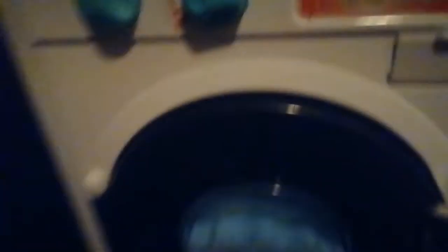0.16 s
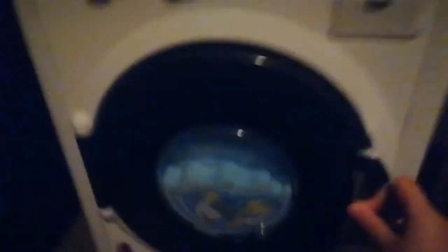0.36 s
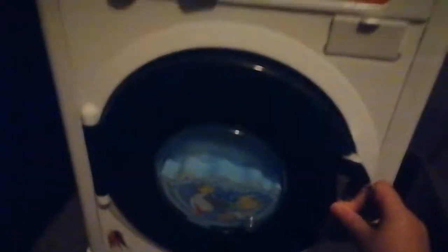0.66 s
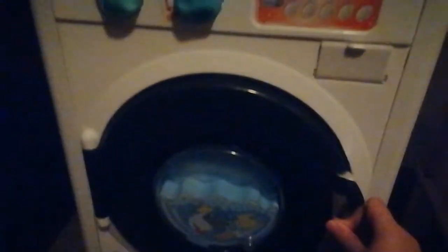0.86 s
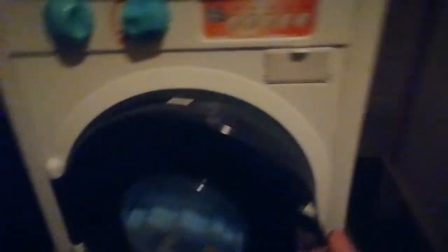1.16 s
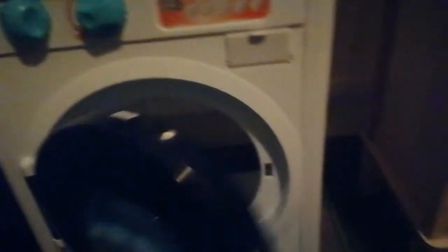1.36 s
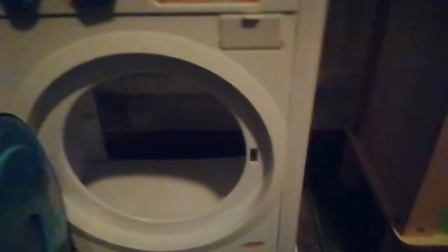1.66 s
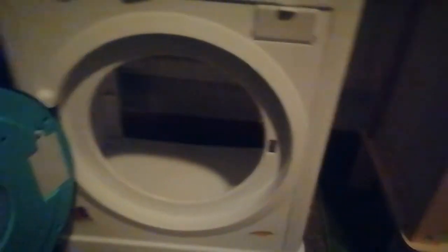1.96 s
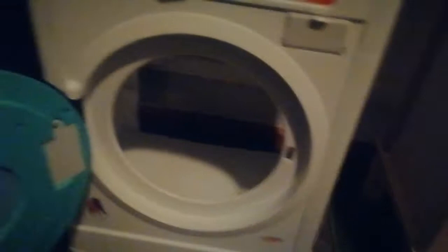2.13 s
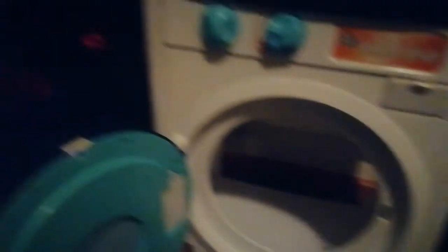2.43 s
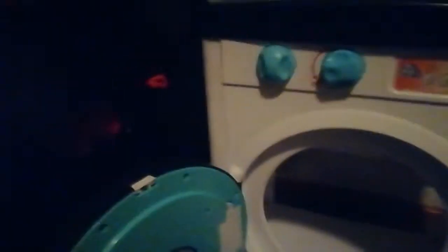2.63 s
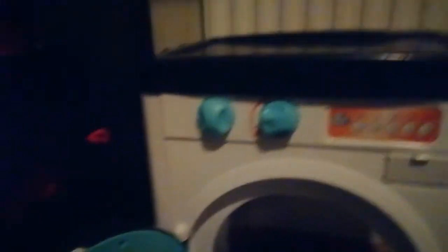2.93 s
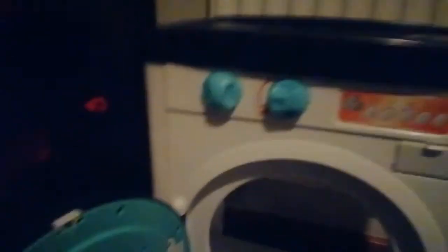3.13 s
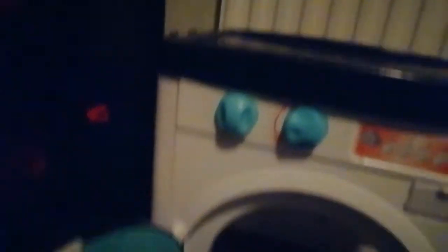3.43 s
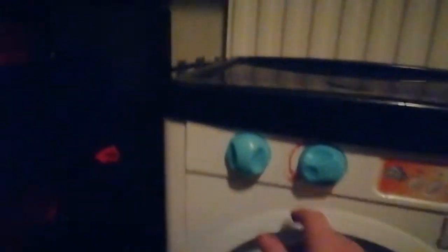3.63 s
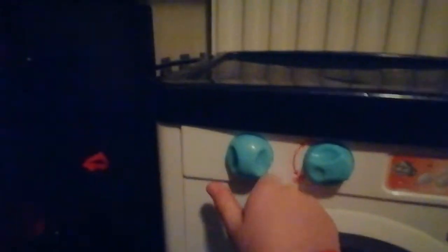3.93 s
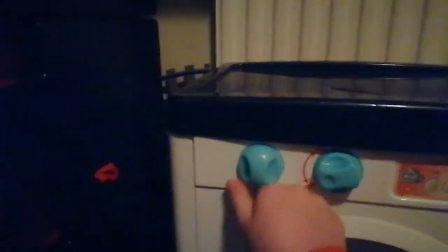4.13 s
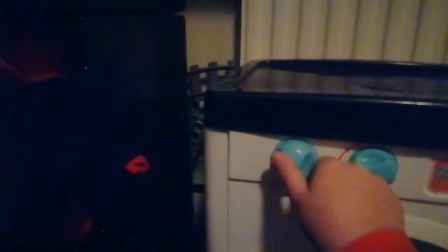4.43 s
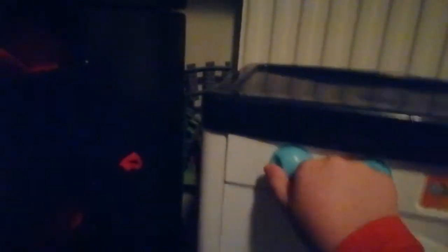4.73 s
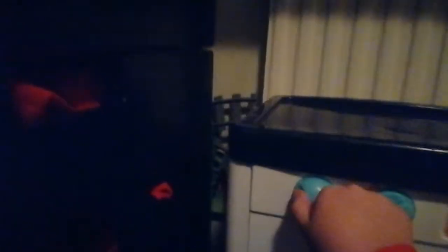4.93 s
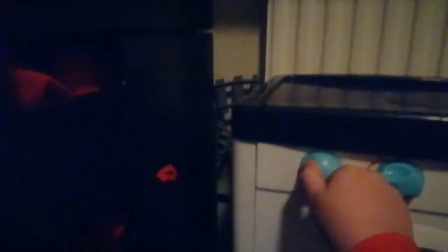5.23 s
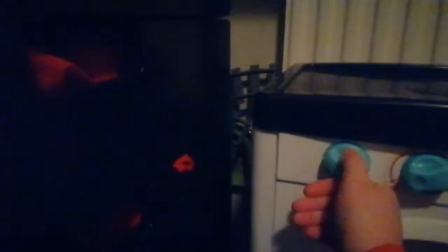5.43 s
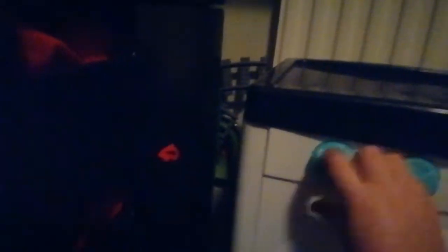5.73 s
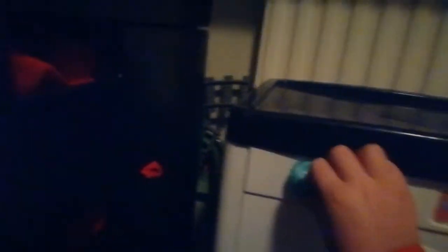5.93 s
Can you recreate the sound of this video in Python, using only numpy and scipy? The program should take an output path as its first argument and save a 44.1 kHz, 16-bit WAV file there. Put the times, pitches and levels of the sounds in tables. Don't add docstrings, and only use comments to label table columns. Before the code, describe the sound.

Hollow plastic toy washer door is tapped, unlatched with creaky clicks and banged open, then a knob ratchets with loud sharp snaps in a small room.

```python
import sys
import numpy as np
from scipy import signal
from scipy.fft import rfft, irfft
from scipy.io import wavfile
from scipy.ndimage import uniform_filter1d

SR = 44100
rng = np.random.default_rng(int(sys.argv[2]) if len(sys.argv) > 2 else 0)


def level_to_linear(level):
    exponent = np.asarray(level, float) / 20
    return 10 ** exponent


def waveform_to_disk(signal):
    frames = np.transpose(np.atleast_2d(signal))
    scaled = np.clip(frames, -1, 1) * 32767
    samples = np.round(scaled).astype(np.int16)
    wavfile.write(sys.argv[1], SR, samples)


N = 268128


def level(x, db):
    return x * level_to_linear(db) / np.sqrt(np.mean(x ** 2))


def colour(x, spectrum):
    hz, db = np.transpose(spectrum)
    f = np.arange(len(x) // 2 + 1) * SR / len(x)
    gain = level_to_linear(np.interp(np.log(f + 1), np.log(hz), db))
    return irfft(rfft(x) * gain, len(x))


def band(x, hz, width_hz):
    return signal.lfilter(*signal.iirpeak(hz, hz / width_hz, fs=SR), x)


def wander(size):
    smooth = uniform_filter1d(rng.standard_normal(N), size)
    return level(uniform_filter1d(smooth, size), 0)


def even(burst):
    spectrum = rfft(burst, 2 * len(burst))
    return irfft(spectrum / np.abs(spectrum))[:len(burst)]


def add(out, s, sound):
    i = int(round(s * SR))
    out[i:i + len(sound)] += sound[:N - i]


# start_s, level_db
RUMBLE_LEVEL = [(0, -68), (0.83, -71), (1.07, -68.5), (1.7, -70.5), (2.2, -67), (3.71, -68), (4.2, -74),
                (5.3, -72.5), (5.42, -68), (6.08, -71.5)]
# centre_s, level_db, half_length_s
SQUEEZES = [
    (1.09, -69, 0.08),
    (3.2, -76, 0.2),
    (4.0, -84, 0.15),
    (5.0, -77.5, 0.2),
    (5.34, -56, 0.08),
    (5.69, -69.5, 0.06),
    (5.98, -78, 0.06),
]
# centre_s, level_db, pitch_hz
THUMPS = [
    (0.429, -57, 21.7),
    (0.471, -58, 20.9),
    (2.563, -44, 116.6),
    (2.674, -59.5, 65),
    (2.706, -47, 40),
    (3.069, -50.5, 22.1),
    (3.091, -48.5, 24.4),
    (3.25, -54.5, 45),
    (4.806, -56, 231),
]


def handling():
    t = np.arange(N) / SR
    motor_hz = 44.5 + 5 * wander(size=2000)
    drone = np.sqrt(2) * np.sin(2 * np.pi * np.cumsum(motor_hz) / SR)
    drone += level(band(band(rng.standard_normal(N), 54.0, 30.0), 54.0, 30.0), -5.5)

    creep = level(band(band(rng.standard_normal(N), 170.0, 250.0), 170.0, 250.0), -1.7)
    creep *= level_to_linear(3.7 * wander(size=600))
    grip = level_to_linear(-80.5)
    for s, db, half_s in SQUEEZES:
        grip = grip + level_to_linear(db) * np.exp(-((t - s) / half_s) ** 2)

    out = drone * level_to_linear(np.interp(t, *np.transpose(RUMBLE_LEVEL))) + creep * grip
    for s, db, hz in THUMPS:
        turn = hz * (t - s)
        out = out + level_to_linear(db) * np.cos(2 * np.pi * turn + 0.18) * np.exp(-3.0 * turn ** 2)
    return out


# frequency_hz, density_db_per_hz
AIR_SPECTRUM = [(60, -30), (150, -8.5), (350, -2), (800, -2.5), (1400, -4.5), (3000, -7.5), (5000, -8.5),
                (9000, -18), (12000, -39)]


def room_air():
    return level(colour(rng.standard_normal(N), AIR_SPECTRUM), -73.5)


# harmonic_multiple, level_db
WHINE_HARMONICS = [(1, -89), (2, -92.5), (4, -81.5)]


def circuit_whine():
    turns = np.cumsum(810 + 5 * wander(size=200)) / SR
    return sum(level_to_linear(db) * np.sqrt(2) * np.sin(2 * np.pi * k * turns) for k, db in WHINE_HARMONICS)


# frequency_hz, density_db_per_hz
HISS_SPECTRUM = [(60, -3.5), (600, -6), (4000, -4.5), (8000, -7.5), (16000, -13.5)]


def port_hiss(db):
    return level(colour(rng.standard_normal(N), HISS_SPECTRUM), db)


def ring(modes, chance=np.zeros((2, 16)), spread_db=0.0):
    hz, db, t60 = np.transpose(modes)[:, :, None]
    t = np.arange(6000) / SR
    gain_chance, pitch_chance = chance[:, :len(modes), None]
    gains = level_to_linear(db + spread_db * gain_chance)
    sines = np.sin(2 * np.pi * hz * (1 + 0.0033 * pitch_chance) * t)
    total = -np.sum(gains * sines * 1000.0 ** (-t / t60), axis=0)
    edges_hz = [0.81 * hz.min(), 3.1 * hz.max()]
    return signal.sosfilt(signal.butter(2, edges_hz, "band", fs=SR, output="sos"), total)


def crack(spectrum, noise, t60):
    t = np.arange(len(noise)) / SR
    fade = 1000.0 ** (-t / t60)
    burst = colour(even(noise * fade), spectrum)
    return burst * np.sqrt(fade) * (1 - np.exp(-t / 0.0001))


def kind(rows, thud_db, crack_db, rattle_ms, extra="thud"):
    events = []
    for s, db, *more in rows:
        more_thud = sum(more) if extra == "thud" else 0
        more_crack = sum(more) if extra == "crack" else 0
        events.append((s, db, thud_db + more_thud, crack_db + more_crack, rattle_ms))
    return events


def blows(events, thud, body, skin, crack_t60, chatter, cap=None):
    out, t_ms = np.zeros(N), 1000 * np.arange(800) / SR
    own = rng.standard_normal(2048)
    grits = rng.standard_normal((len(events), 2848))
    chances = rng.standard_normal((len(events), 2, 2, 16))
    for event, grit, (thud_chance, ring_chance) in zip(events, grits, chances):
        s, db, thud_db, crack_db, rattle_ms = event
        age = t_ms / max(rattle_ms, 0.1)
        push = chatter * grit[:800] ** 3 * age * np.exp(1 - age)
        push[0] = 1
        contact_hz = min(7000 + 30000 * level_to_linear(db), 19000)
        push = signal.lfilter(*signal.butter(2, contact_hz, fs=SR), even(push))

        struck = cap if cap and db < -20 else body
        parts = [(ring(thud, thud_chance, 0.68), thud_db),
                 (ring(struck, ring_chance, 0.72), 0),
                 (crack(skin, own + grit[800:], crack_t60), crack_db)]
        for response, part_db in parts:
            part = signal.fftconvolve(push, response)
            add(out, s, level_to_linear(db + part_db) * part / np.abs(part).max())
    return out


# frequency_hz, level_db, t60_s
DRUM_MODES = [(162, 2, 0.031), (224.6, 13, 0.058), (312, 2.5, 0.029), (420, 1, 0.046), (537, -5.5, 0.13),
              (758, -31, 0.12)]
DOOR_MODES = [(764, -0.5, 0.057), (918, 7, 0.016), (1450, 8.5, 0.0062), (1940, -9, 0.014)]
# frequency_hz, density_db_per_hz
RIM_SPECTRUM = [(500, -14.5), (1200, -14.5), (2200, -11), (3200, -9.5), (4300, -1.5), (5500, -7.5),
                (7200, -14), (9500, -27.5), (15000, -42)]
# start_s, ring_db
TAPS = [
    (0.141, -60),
    (0.334, -56),
    (0.492, -57),
    (0.634, -53),
]
# start_s, ring_db
TICKS = [
    (0.521, -68),
    (0.9273, -52),
    (0.9787, -45),
    (1.074, -49),
    (1.1895, -63),
    (1.423, -52.5),
    (1.518, -67),
]
# start_s, ring_db, extra_thud_db
PULLS = [(0.904, -45, 0.5), (0.927, -72, 0), (0.935, -42, -10), (0.943, -48, 1), (0.959, -63, 10),
         (0.976, -49, 6.5), (1.012, -63, 2), (1.088, -57, -3), (1.102, -53, -14), (1.112, -55, 9.5),
         (1.148, -50, 11), (1.191, -43.5, -10.5)]
# start_s, ring_db, extra_thud_db
SWINGS = [
    (1.384, -59, -2),
    (1.454, -49, -18),
    (1.476, -55.5, 10),
    (1.485, -67, 16),
]


def door_and_latch():
    events = kind(TAPS, thud_db=2.6, crack_db=-7, rattle_ms=2.4)
    events += kind(TICKS, thud_db=-19, crack_db=8.4, rattle_ms=0.89)
    events += kind(PULLS, thud_db=0.1, crack_db=-8.5, rattle_ms=1.18)
    events += kind(SWINGS, thud_db=-14, crack_db=-12, rattle_ms=1.9)
    return blows(events, DRUM_MODES, DOOR_MODES, RIM_SPECTRUM, crack_t60=0.013, chatter=0.071)


# start_s, length_s, rub_db, drum_minus_rub_db
RUBS = [
    (0.904, 0.047, -67, 15),
    (0.975, 0.0066, -46, 7.5),
    (1.008, 0.067, -61.5, -3),
    (1.073, 0.033, -53, -2),
    (1.119, 0.082, -57, 15.5),
    (1.415, 0.0089, -64, -12),
    (1.464, 0.019, -69.5, 5),
    (1.484, 0.037, -73.5, 9),
    (3.755, 0.039, -71.5, 13.5),
    (4.278, 0.024, -84.5, 24.5),
]
# frequency_hz, density_db_per_hz
RUB_SPECTRUM = [(300, -16.5), (700, -4.5), (1600, 3), (3000, -0.5), (4400, -2.5), (6500, -9), (9500, -22.5),
                (15000, -33)]


def rubbing():
    t, out = np.arange(N) / SR, 0
    attack_s, release_s = 0.0021, 0.0117
    slips = rng.standard_normal(N) * level_to_linear(4.0 * rng.exponential(size=N).clip(0, 5))
    skin = level(colour(slips, RUB_SPECTRUM), 0.55)
    drum = level(signal.fftconvolve(slips, ring(DRUM_MODES))[:N], -5.5)
    for s, length_s, db, drum_db in RUBS:
        rise = np.clip((t - s) / attack_s, 0, 1)
        fall = np.exp(-np.clip(t - s - length_s, 0, 1) / release_s)
        out = out + rise * fall * level_to_linear(db) * (skin + level_to_linear(drum_db) * drum)
    return out


# centre_s, level_db, pitch_hz, swell_ms
GROANS = [
    (1.14, -25.5, 230, 2.84),
    (1.195, -35.5, 212, 1.8),
    (3.7984, -53, 2810, 1.3),
    (1.075, -43.5, 4200, 1.1),
]


def groans():
    t, out = np.arange(N) / SR, np.zeros(N)
    for s, db, hz, swell_ms in GROANS:
        swell = 1 / np.cosh(1000 * (t - s).clip(-0.2, 0.2) / swell_ms)
        out += level_to_linear(db) * np.sin(2 * np.pi * hz * (t - s)) * swell
    return out


# frequency_hz, level_db, t60_s
CABINET_MODES = [(122.8, -10.5, 0.03), (189, -18, 0.027), (290, -9, .08), (412.4, 4, 0.071),
                 (491, 1.5, .06), (591.5, 3.5, 0.055)]
SHELL_MODES = [(743, -8, 0.15), (927, 5, 0.032), (1028, 8, 0.027), (1200, 6.5, 0.04), (1300, -7, 0.045)]
# start_s, ring_db, extra_crack_db
BANGS = [
    (2.1005, -26.5, 7),
    (2.114, -30, -1),
    (2.127, -39, 3),
]
# start_s, ring_db, extra_crack_db
BOUNCES = [
    (2.105, -32, 20),
    (2.1603, -69, 6),
    (2.1605, -21, -9.5),
    (2.197, -57, -15),
]


def door_stop():
    events = kind(BANGS, thud_db=-3, crack_db=0.1, rattle_ms=3.3, extra="crack")
    events += kind(BOUNCES, thud_db=-17.5, crack_db=0.09, rattle_ms=0.22, extra="crack")
    return blows(events, CABINET_MODES, SHELL_MODES, RIM_SPECTRUM, crack_t60=0.014, chatter=0.13)


# frequency_hz, level_db, t60_s
KNOB_MODES = [(626, -4.5, .03), (922, -1.5, 0.039), (1180, -18, .025), (1265, -2.5, 0.036), (1460, 3, 0.03),
              (1496, -0.5, 0.02), (1722, 7.5, 0.023), (1874, -12.5, 0.0099), (2210, 0, 0.026)]
CAP_MODES = [(885, -14, .025), (1224, -6.5, .03), (1481, 2.5, 0.032), (1679, 2.5, 0.026), (2218, -12, 0.03),
             (3110, -8.5, .02), (4330, -12, .015), (4644, -6.5, 0.02), (5540, -12.5, 0.012)]
# frequency_hz, density_db_per_hz
PAWL_SPECTRUM = [(500, -30), (1000, -25), (2000, -0.5), (3000, -7), (4300, 3.5), (5500, -6), (6500, -5.5),
                 (8000, -14.5), (10500, -29.5), (15000, -43)]
# start_s, ring_db, extra_thud_db
TOUCHES = [(3.741, -54, 11.5), (3.77, -60, 10), (4.193, -51, 4), (4.275, -59, 7.5), (4.295, -79, -6),
           (4.453, -44.5, -9), (4.671, -50, 4), (4.7, -48, 0.5), (5.171, -74, 6), (5.568, -47.5, 10.5),
           (5.67, -65, -2)]
# start_s, ring_db
CATCHES = [
    (4.457, -36),
    (5.744, -33.5),
    (5.76, -46),
    (5.805, -23.5),
]
# start_s, ring_db
SNAPS = [
    (5.221, -7),
    (5.309, -7),
    (5.372, -4.5),
    (5.439, -5),
    (6.049, -7),
]
# start_s, ring_db
BACK_TICKS = [
    (5.849, -54),
]


def ratchet_knob():
    events = kind(TOUCHES, thud_db=-11, crack_db=-19, rattle_ms=1.5)
    events += kind(CATCHES, thud_db=-15, crack_db=-10, rattle_ms=0.72)
    events += kind(SNAPS, thud_db=-23, crack_db=0.16, rattle_ms=0.66)
    events += kind(BACK_TICKS, thud_db=-31, crack_db=2.3, rattle_ms=0.31)
    return blows(sorted(events), CABINET_MODES, KNOB_MODES, PAWL_SPECTRUM,
                 crack_t60=0.014, chatter=0.025, cap=CAP_MODES)


# delay_ms, level_db
ECHOES = [(3.8, -12.5), (6.1, -15), (7.2, -20), (11, -20)]
# frequency_hz, t60_s, level_db
REVERB = [(150, 0.1, -16.5), (600, 0.24, -18.5), (1440, 0.19, -22.5), (2920, 0.24, -15.5),
          (4700, 0.2, -18.5), (9720, 0.21, -20)]


def room(x):
    t = np.arange(SR // 2) / SR
    hz, t60, db = np.transpose(REVERB)
    noise = rfft(rng.standard_normal(len(t)))
    log_hz = np.log(2 * np.arange(len(t) // 2 + 1) + 1)
    tail = np.zeros(len(t))
    for share, band_t60, band_db in zip(np.eye(len(hz)), t60, db):
        part = irfft(noise * np.interp(log_hz, np.log(hz), share), len(t))
        tail += level_to_linear(band_db) * part * 1000.0 ** (-t / band_t60)
    answer = 0.13 * tail * np.clip(t / 0.0014, 0, 1)
    for ms, echo_db in [(0, 0)] + ECHOES:
        add(answer, ms / 1000, level_to_linear([echo_db]))
    return signal.fftconvolve(x, answer)[:N]


def scene():
    toy = ratchet_knob() + door_and_latch() + door_stop()
    near = room(level_to_linear(5.0) * toy + rubbing() + groans())
    field = near + handling() + room_air()
    return np.array([field, field])


def covered_port(x):
    lag, cutoff_hz = 24, 306
    pole = np.exp(-2 * np.pi * cutoff_hz / SR)
    return signal.lfilter([1 - pole], [1, -pole], np.r_[np.zeros(lag), x[:-lag]])


def roll_off(x):
    return signal.sosfilt(signal.butter(12, 16810, fs=SR, output="sos"), x)


def record(dry):
    left = covered_port(dry[0]) + circuit_whine()
    ports = np.array([left + port_hiss(-77), dry[1] + port_hiss(-75.5)])
    ports = signal.sosfilt(signal.ellip(10, 0.2, 60, 16000, fs=SR, output="sos"), ports)
    ceiling = 0.98
    mix = ceiling * ports / (ceiling ** 6 + ports ** 6) ** (1 / 6)
    return roll_off(mix)


dry = scene()
out = record(dry)
waveform_to_disk(out)
```